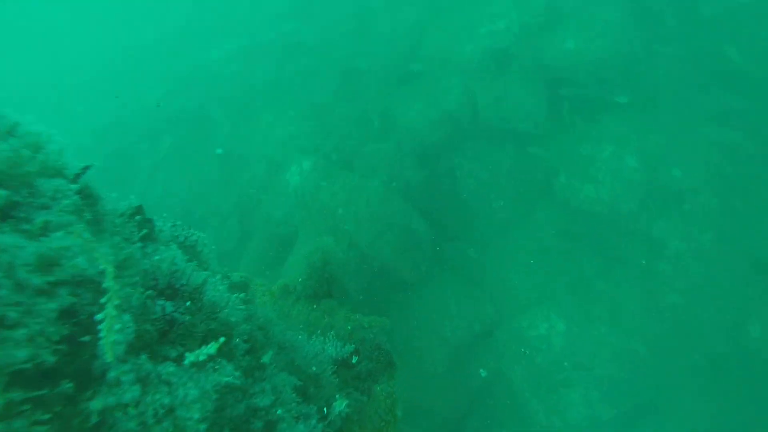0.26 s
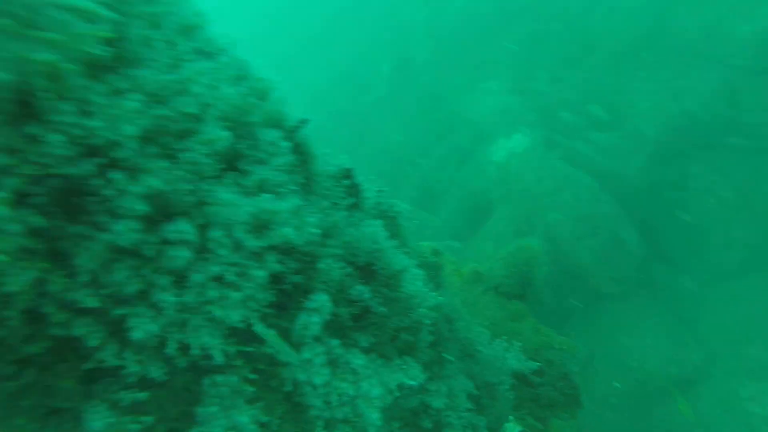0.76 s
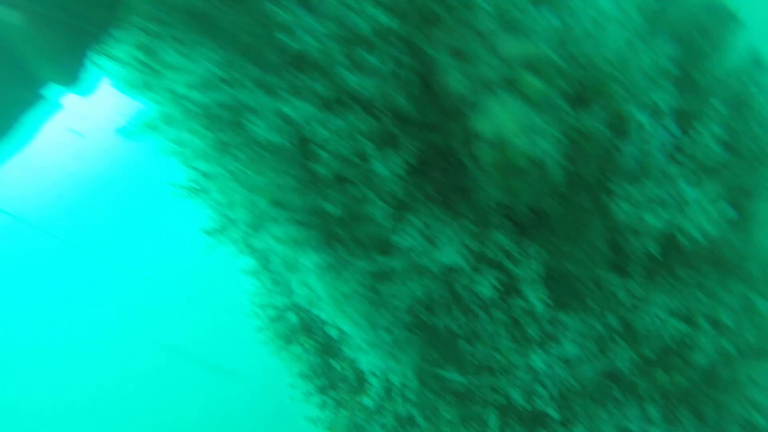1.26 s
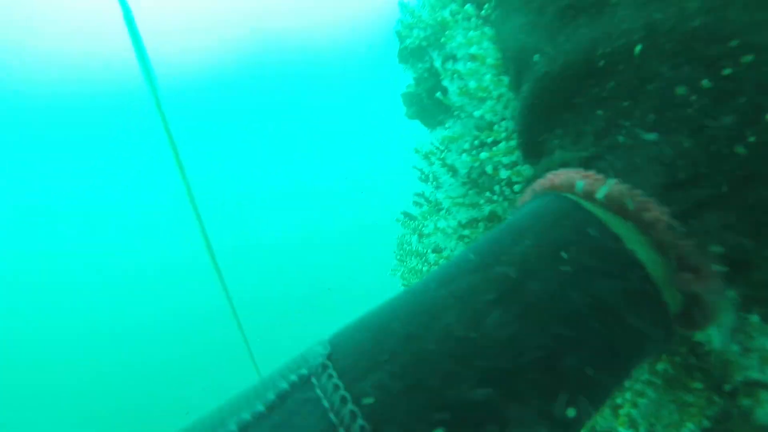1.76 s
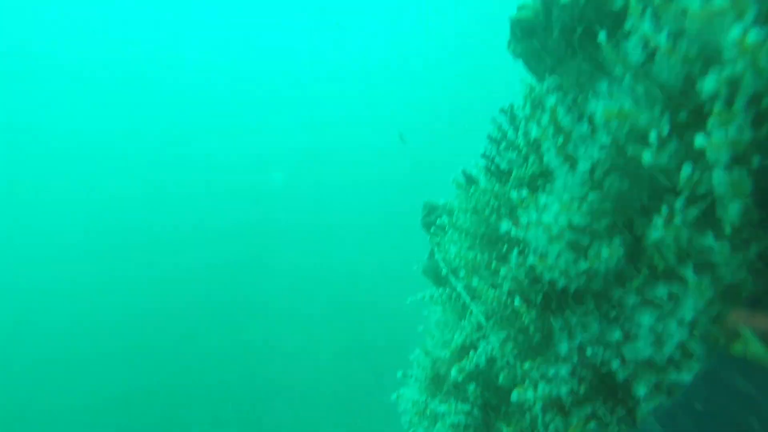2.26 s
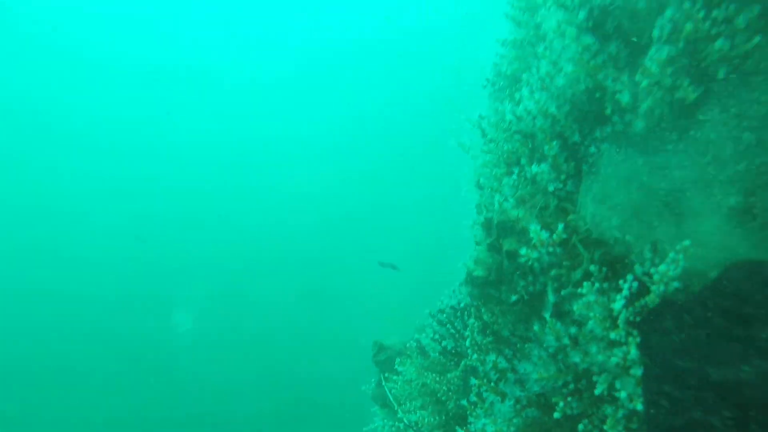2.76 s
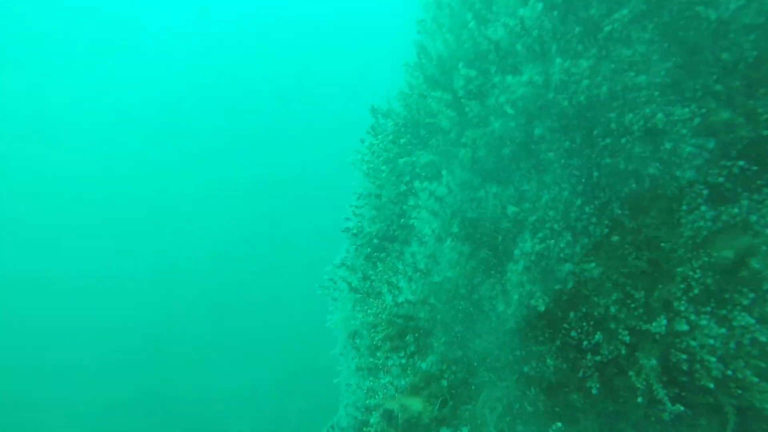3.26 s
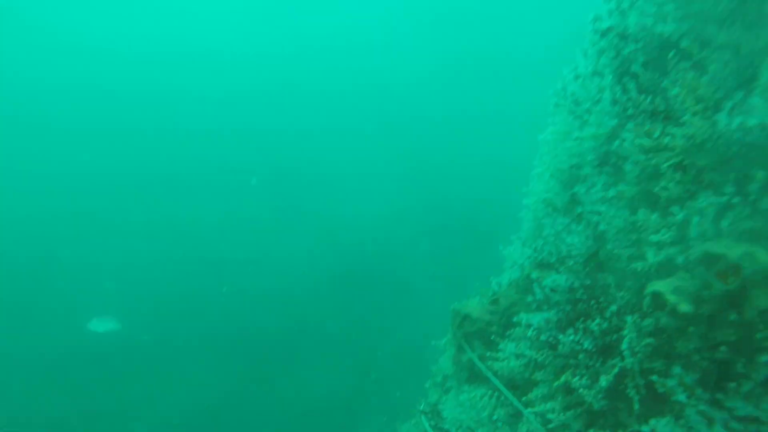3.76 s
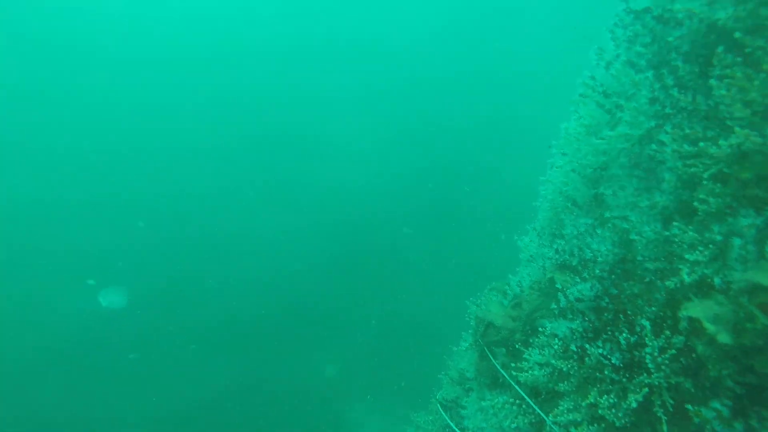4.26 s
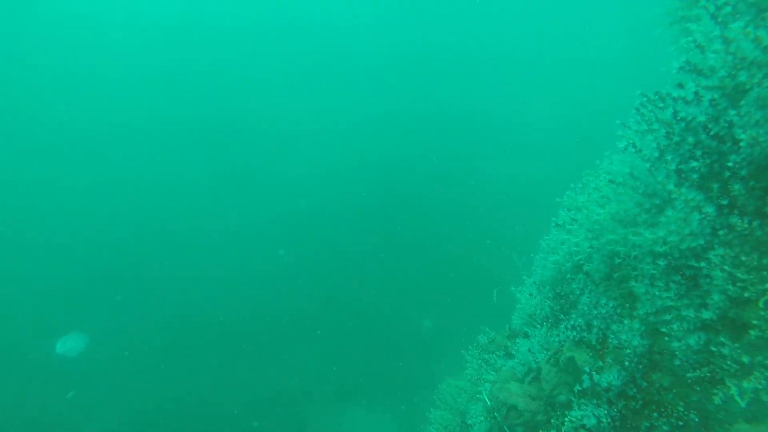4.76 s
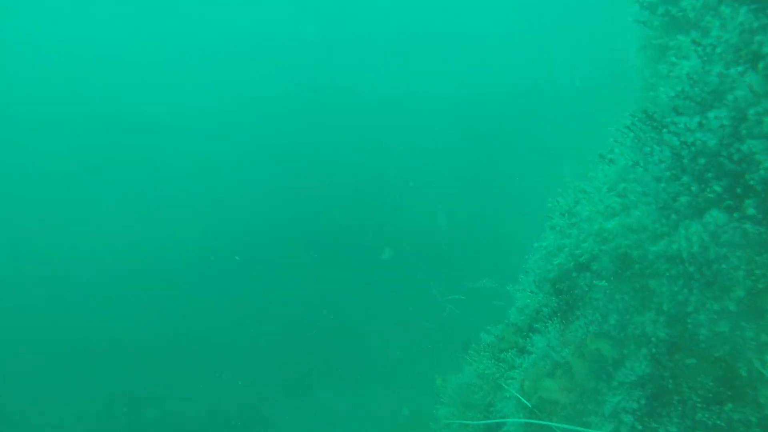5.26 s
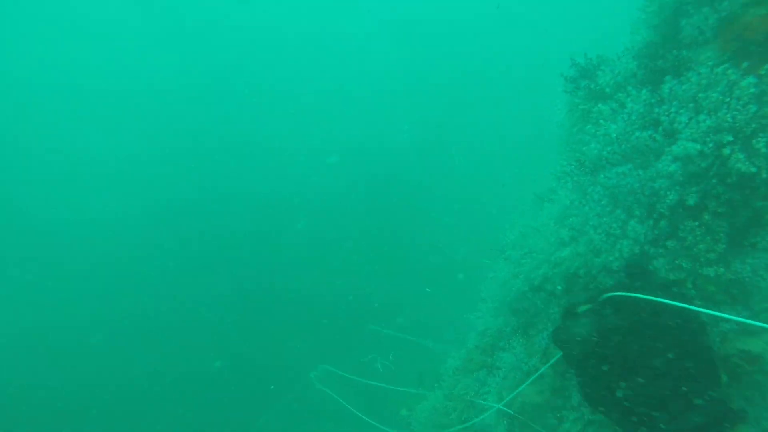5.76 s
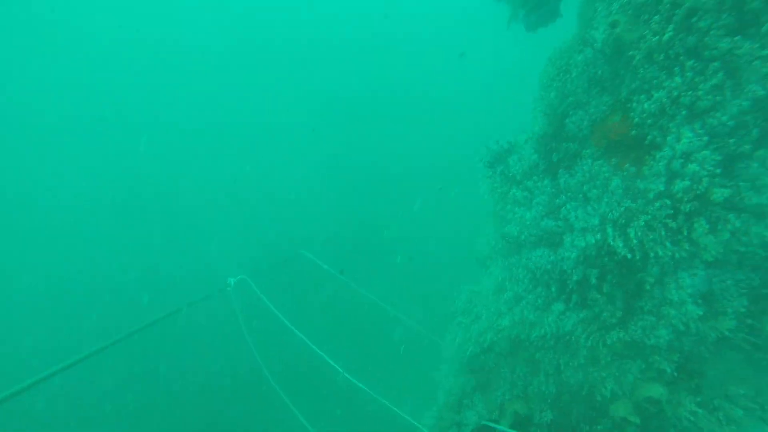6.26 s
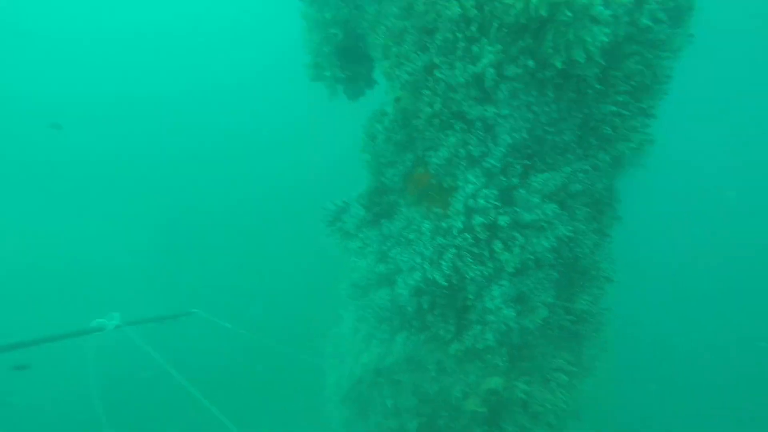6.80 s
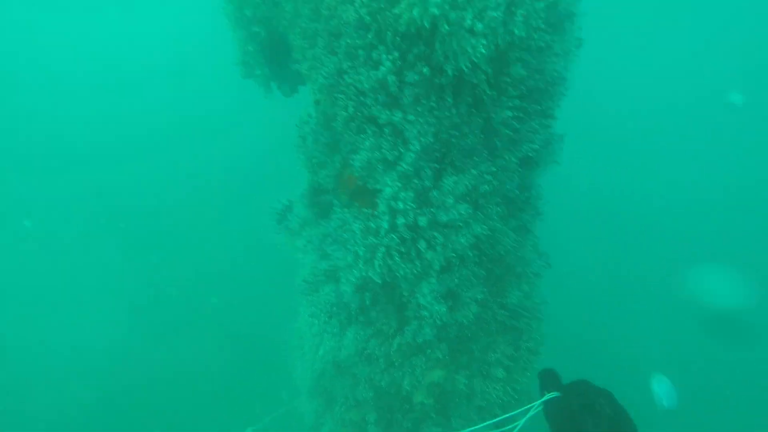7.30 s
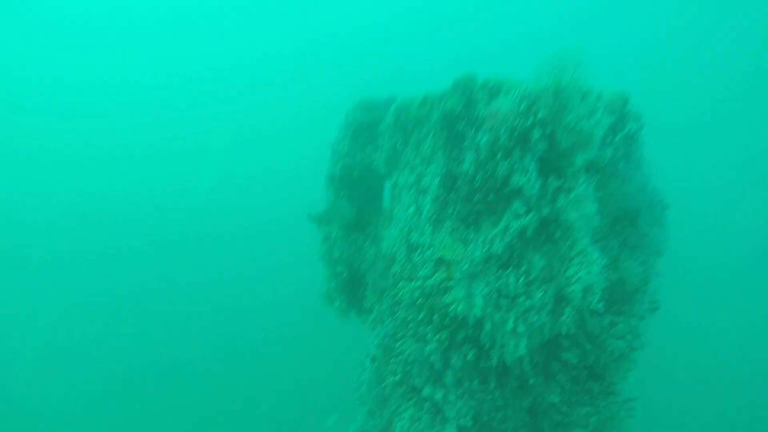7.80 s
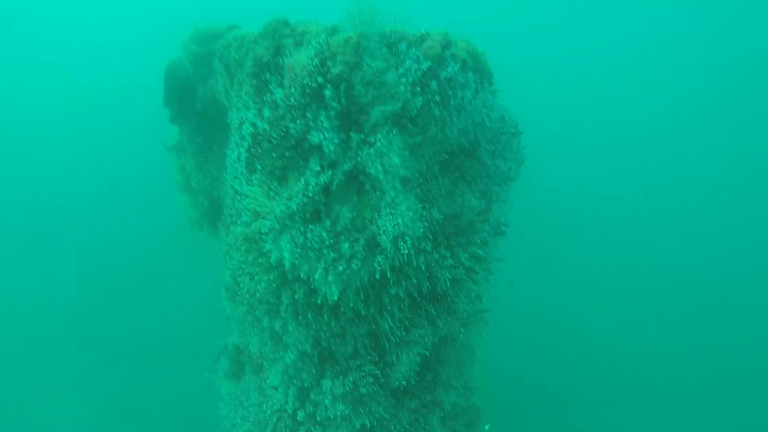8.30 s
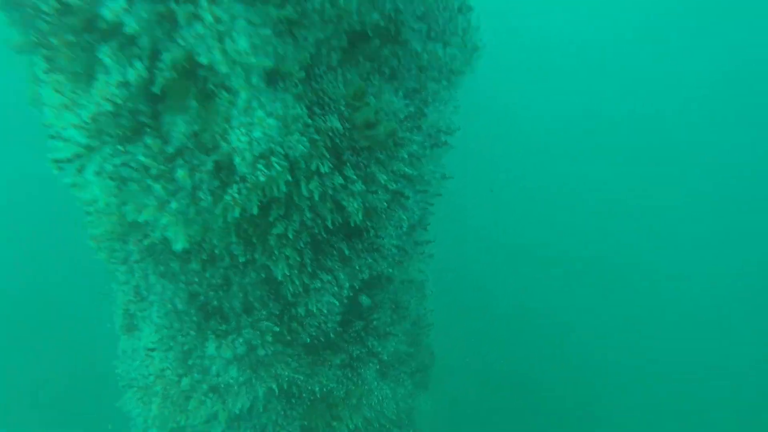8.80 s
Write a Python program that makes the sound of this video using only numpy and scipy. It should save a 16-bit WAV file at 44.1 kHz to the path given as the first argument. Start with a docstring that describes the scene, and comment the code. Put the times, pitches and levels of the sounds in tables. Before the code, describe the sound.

The microphone sits inside a waterproof case under water, so handling is close, hollow and boxy. A deep, wavering flow rumble and faint steady hiss run throughout, with a fine distant shrimp crackle. From 0.3 to 1.2 s the case is knocked repeatedly: the strongest hits at 0.32 and 0.6 ring around a mid-pitched shell note, with low thuds and scraping. A bubble ticks at 1.3. Rubbing continues; short rubber squeaks come at 2.0-2.2 and a falling one at 2.9, among lighter bumps. A hard knock cluster lands at 3.32-3.37, with a dull thump at 3.6. A plump bubble pops at 4.18. Sparse snaps follow, then bumps from 5.6 and the loudest sharp snap at 5.7. Bubbles burst in a quick run at 6.7-6.9, a faint knock comes at 7.35, and more plops scatter over 8.0-8.5. Clicks, hiss and rumble remain to about 9 s.

```python
"""A hand knocks and rubs a waterproof camera housing under water, heard from inside it: contacts
excite damped resonances of mount, shell, walls and window, and the grip thumps and squeaks.
Small bubbles pop close by as short sinking tones; shrimp snap in the growth on a piling as
pulses through resonances, echoed by the surface. Behind lie rumble and hiss as shaped noise."""
import sys
import numpy as np
from scipy import signal
from scipy.fft import rfft, irfft, next_fast_len
from scipy.io import wavfile
from scipy.ndimage import uniform_filter1d

SR = 44100
rng = np.random.default_rng(int(sys.argv[2]) if len(sys.argv) > 2 else 0)


def generate_wav(sig):
    """Save sig (samples, or channels by samples) to the path in sys.argv[1] as 16-bit PCM at SR."""
    pcm = np.round(np.clip(np.atleast_2d(sig).T, -1, 1) * 32767).astype(np.int16)
    wavfile.write(sys.argv[1], SR, pcm)


N = 398663
T = np.arange(N) / SR
EVENT_T = np.arange(SR // 4) / SR  # time axis of one short event
SNAP_T = EVENT_T[:2000]


def from_db(db):
    """Level law: decibels become an amplitude ratio."""
    return 10 ** (np.asarray(db) / 20)


def rms_one(x):
    """Power normalization: scale to rms 1."""
    return x / np.sqrt(np.mean(x ** 2) + 1e-20)


def peak_one(x):
    """Peak normalization: scale to peak 1."""
    return x / (np.abs(x).max() + 1e-12)


def burst_one(x):
    """Short-time power normalization: the loudest five milliseconds get rms 1."""
    power = uniform_filter1d(x ** 2, size=220)
    return x / np.sqrt(power.max() + 1e-20)


def add(out, s, sound):
    """Superposition: mix a sound in at a time in seconds."""
    i = max(int(s * SR), 0)
    out[i:i + len(sound)] += sound[:max(N - i, 0)]


def cut(x, hz, kind, order=2):
    """Butterworth filtering: low-pass or high-pass."""
    sos = signal.butter(order, min(hz, 0.45 * SR), kind, fs=SR, output="sos")
    return signal.sosfilt(sos, x)


def drift(rate):
    """Random modulation: straight lines between chance values, rate per second, rms 1."""
    knots = rng.standard_normal(4000)
    return rms_one(np.interp(T * rate, np.arange(len(knots)), knots))


def resonate(force, modes):
    """Modal superposition: parallel damped resonances with alternating signs."""
    out = 0
    for k, (hz, width, db) in enumerate(modes):
        r = np.exp(-np.pi * width / SR)
        poles = [1, -2 * r * np.cos(2 * np.pi * hz / SR), r * r]
        gain = (-1) ** k * from_db(db) * (1 - r * r) / 2
        out = out + gain * signal.lfilter([1, 0, -1], poles, force + 1e-18)
    return out


def coloured_noise(spectrum):
    """Spectral shaping: steady noise with a given spectrum, rms 1."""
    hz, db = np.transpose(spectrum)
    size = next_fast_len(N)
    bins = np.maximum(np.fft.rfftfreq(size, 1 / SR), 1)
    gain = from_db(np.interp(np.log(bins), np.log(hz), db, left=-90, right=-90))
    return rms_one(irfft(rfft(rng.standard_normal(size)) * gain, size)[:N])


def friction(count, grain_db):
    """Dry friction: a stream of tiny slips of uneven size."""
    return rng.standard_normal(count) * from_db(grain_db * rng.standard_normal(count))


def swell(rise):
    """Transient loading: a smooth rise to 1 at the rise time in seconds, then a decay."""
    return (EVENT_T / rise * np.exp(1 - EVENT_T / rise)) ** 2


# Resonances of the thin walls. Each row: pitch in Hz, width in Hz, relative level in dB.
WALL_MODES = [(949, 23, 0.5), (1120, 240, 3.5), (1513, 146, 0), (1600, 61, 1.5), (1880, 92, 3),
              (2072, 178, 2.5), (2396, 201, 2.5), (3150, 79, -9), (3650, 800, -12), (4230, 210, -15)]


def walls(force, top_hz):
    """Plate resonance: the thin walls ring between the shell note and an upper limit."""
    ringing = cut(resonate(force, WALL_MODES), top_hz, "low", order=4)
    return cut(ringing, 960, "high")


# Knocks on the housing. Each row: start in seconds, time to full force in seconds, then levels
# in dB before the overall trims: scuff of the walls, mount thud, shell ring, grit in the window.
KNOCKS = [(0.3164, 0.0039, -25, -50, -25, -44), (0.319, 0.0035, -20, -17.5, -20, -30),
          (0.322, 0.0038, -18.5, -23, -4, -56), (0.339, 0.0043, -38, -32, -22.5, -61),
          (0.595, 0.0054, -37.5, -45, -29, -50.5), (0.602, 0.0055, -20.5, -28, -9, -33),
          (0.612, 0.0026, -26, -25, -8.5, -46.5), (0.63, 0.0055, -37.5, -38.5, -33.5, -66.5),
          (0.713, 0.003, -45.5, -45, -41, -62), (0.82, 0.0063, -34, -38.5, -32, -58),
          (0.875, 0.0033, -26.5, -39, -14.5, -54), (0.883, 0.0038, -20.5, -24, -29, -49),
          (0.938, 0.0029, -29, -48, -26.5, -69), (0.975, 0.0066, -34.5, -28, -20.5, -75),
          (1.007, 0.0022, -30.5, -32.5, -23, -58), (1.089, 0.0074, -31, -39.5, -25, -54.5),
          (1.185, 0.0019, -21.5, -30.5, -22.5, -64), (1.203, 0.0038, -56, -40, -23, -74),
          (1.431, 0.0032, -40, -49, -32, -51.5), (2.029, 0.0088, -37.5, -44, -37.5, -58),
          (2.046, 0.0075, -37, -34.5, -44, -55.5), (2.209, 0.0043, -33.5, -28, -31, -62),
          (2.255, 0.0085, -42, -37.5, -50, -71), (2.316, 0.0028, -50, -29, -30.5, -76),
          (2.453, 0.0034, -42, -34, -32.5, -78), (2.706, 0.0022, -34, -27.5, -26, -61),
          (2.712, 0.0055, -34.5, -34, -28.5, -65), (2.913, 0.0032, -31.5, -26.5, -24.5, -52),
          (2.92, 0.0043, -39, -30, -23, -76), (3.318, 0.0032, -22.5, -21.5, -26, -42),
          (3.33, 0.0026, -17.5, -30.5, -24, -47), (3.339, 0.0033, -23.5, -20, -5, -51),
          (3.353, 0.0028, -28, -30, -13, -60), (3.365, 0.0041, -45.5, -32.5, -19.5, -58.5),
          (3.444, 0.0097, -39, -44, -39, -74), (3.461, 0.0096, -35.5, -46, -39, -78),
          (5.257, 0.01, -39, -45, -41, -61), (5.274, 0.0017, -36.5, -30, -36, -68),
          (5.588, 0.0076, -26.5, -37, -27, -53), (5.608, 0.0037, -25.5, -32, -26.5, -52),
          (5.672, 0.0053, -33.5, -34, -33, -61), (5.69, 0.0019, -21.5, -34, -25, -58),
          (5.6993, 0.0018, -18, -28.5, -19, -57), (7.345, 0.0045, -33, -42, -29, -49.5)]
# Resonances of mount, shell and window. Each row: pitch in Hz, width in Hz, relative level in dB.
MOUNT_MODES = [(112.6, 37, 1.5), (173, 51, 4), (229, 65, 2.5), (343, 108, 0), (428, 52, 3),
               (634, 207, -0.5)]
SHELL_MODES = [(765, 70, -5), (840, 60, 0)]
WINDOW_MODES = [(5570, 410, 2.5), (6180, 140, 4.5), (7210, 380, 3), (7950, 270, 2.5), (9430, 440, -1),
                (12200, 1200, -15.5), (14300, 730, -31.5)]
SHELL_HZ = 828


def knocks(rough=0.41, linger=0.14, linger_s=0.014, settle=0.14, settle_s=0.032,
           sharp_hz=4500, scuff_db=0.5, thud_db=0, ring_db=0, grit_db=0):
    """Impact excitation: each contact is a short skid that rings the shell and other parts."""
    out = np.zeros(N)
    for s, rise, scuff, thud, ring, grit in KNOCKS:
        slips = friction(len(EVENT_T), grain_db=1)
        skid = slips * (swell(0.87 * rise) + linger * np.exp(-EVENT_T / linger_s))
        shove = slips * (swell(1.44 * rise) + settle * np.exp(-EVENT_T / settle_s))

        note_hz = SHELL_HZ * (1 + 0.0069 * rng.standard_normal())
        note = np.sin(2 * np.pi * note_hz * EVENT_T)
        # the note needs a few cycles to build up
        clear_ring = burst_one(swell(1.02 * rise) ** 0.75 * note)
        shell = clear_ring + rough * burst_one(resonate(skid, SHELL_MODES))

        body = cut(cut(resonate(shove, MOUNT_MODES), 1000, "low"), 230, "high")
        top_hz = sharp_hz * (0.0053 / rise) ** 0.71  # slow contacts are duller
        window = cut(resonate(skid, WINDOW_MODES), 4200, "high")

        knock = from_db(ring + ring_db) * burst_one(shell)
        knock += from_db(thud + thud_db) * burst_one(body)
        knock += from_db(scuff + scuff_db) * burst_one(walls(skid, top_hz))
        knock += from_db(grit + grit_db) * burst_one(window)
        add(out, s, knock)
    return out


# Soft bumps of the mount. Each row: start in seconds, peak in dB, pitch in Hz, and the time in
# seconds in which the swing decays by 60 dB.
BUMPS = [(0.332, -27, 173, 0.21), (0.325, -26, 113, 0.16), (0.622, -32, 109, 0.28),
         (0.886, -21.5, 169.3, .15), (1.118, -25.5, 94, 0.12), (1.191, -27.5, 148.5, 0.2),
         (2.22, -32, 176, 0.18), (2.713, -33, 98, 0.04), (3.329, -23, 83.5, 0.13),
         (3.613, -20.5, 78, 0.015), (5.287, -37, 173, 0.35), (5.61, -30, 165, 0.17),
         (5.708, -24, 83, 0.075)]


def bumps():
    """Damped oscillation: the springy mount swings and dies away exponentially."""
    out = np.zeros(N)
    for s, db, hz, t60 in BUMPS:
        onset = 1 - np.exp(-2 * hz * EVENT_T)
        swing = np.sin(2 * np.pi * hz * EVENT_T) * from_db(-60 * EVENT_T / t60) * onset
        add(out, s, from_db(db) * peak_one(swing))
    return out


# Strokes of the grip on the case. Each row: start in seconds, length in seconds, level in dB
# before the overall trims, shell ring relative to that level in dB.
STROKES = [(0.798, 0.3, -42.5, 9), (1.104, 0.13, -50.5, 13.5), (1.248, .33, -47, 2),
           (2.016, 0.32, -50.5, 2.5), (2.375, 0.16, -54, 3.5), (2.65, 0.33, -60, 5.5),
           (3.446, 0.25, -55, 6.5), (3.908, 0.086, -53, -2), (4.321, .16, -47, -3), (4.625, 0.21, -58, 2.5),
           (4.999, 0.3, -54, -6), (5.521, 0.17, -50.5, 1.5), (6.107, 0.15, -59.5, 5),
           (6.646, 0.25, -53.5, 2.5), (7.04, 0.044, -50, 4), (7.224, 0.25, -53, -1.5),
           (7.553, 0.11, -54.5, 3), (8.456, 0.32, -60, -7)]
# the resting grip in shell and walls, and its random swing
REST_SHELL_DB, REST_WALL_DB, REST_SWING_DB = -60, -61, 3
# the mount's level at rest, and its dB per dB of the shell's rise above rest
REST_MOUNT_DB, MOUNT_FOLLOWS = -55.5, 0.42
STROKE_ATTACK_S, STROKE_RELEASE_S = 0.021, 0.016


def grip():
    """Power addition: strokes build on the resting grip; returns mount, shell and wall strength."""
    rest = from_db(REST_SWING_DB * drift(13))
    shell_power = (rest * from_db(REST_SHELL_DB)) ** 2
    wall_power = (rest * from_db(REST_WALL_DB)) ** 2
    for start, length, db, ring_db in STROKES:
        attack = np.clip((T - start) / STROKE_ATTACK_S, 0, 1)
        release = np.exp(-np.maximum(T - start - length, 0) / STROKE_RELEASE_S)
        push = from_db(db) * attack * release
        wall_power = wall_power + push ** 2
        shell_power = shell_power + (push * from_db(ring_db)) ** 2
    shell, wall = np.sqrt(shell_power), np.sqrt(wall_power)
    mount = from_db(REST_MOUNT_DB) * (shell / from_db(REST_SHELL_DB)) ** MOUNT_FOLLOWS
    return mount, shell, wall


def rubbing(shell_db=-1, wall_db=-1, mount_db=-1, edge_db=-11, grit_db=-25, judder_db=4, shift_db=4):
    """Friction excitation: the sliding grip feeds juddering slips into the same resonances."""
    mount, shell, wall = grip()
    slips = friction(N, grain_db=4) * from_db(judder_db * drift(160))
    # as the contact point moves, each wall resonance takes a changing share
    moving = np.zeros(N)
    for k, mode in enumerate(WALL_MODES):
        share = from_db(shift_db * drift(9))
        moving += (-1) ** k * resonate(slips, [mode]) * share
    wall_ring = cut(cut(moving, 1050, "high", order=3), 4600, "low", order=4)
    edge = cut(cut(slips, 4170, "low", order=8), 1298, "high")
    high = from_db(wall_db) * rms_one(wall_ring)
    high += from_db(edge_db) * rms_one(edge)
    high += from_db(grit_db) * rms_one(resonate(slips, WINDOW_MODES))
    middle = from_db(shell_db) * rms_one(resonate(slips, SHELL_MODES))
    low = from_db(mount_db) * rms_one(cut(resonate(slips, MOUNT_MODES), 550, "low"))
    return mount * low + shell * middle + wall * high


# Squeaks of the grip. Each row: start in seconds, length in seconds (played for a quarter second
# at most), start pitch in Hz, end pitch in Hz, rms level in dB, roughness from 0 to just above 1.
SQUEAKS = [(2.025, 0.044, 1976, 2165, -41.5, 0.75), (2.051, 0.18, 2070, 2050, -56, 0.75),
           (2.022, 0.26, 1650, 1605, -59, 0.4), (2.197, 0.014, 2040, 1970, -36, 0.4),
           (2.869, 0.061, 2420, 1970, -46.5, 0.7), (2.871, 0.06, 3650, 2940, -53, 1.1),
           (2.876, 0.05, 4450, 3970, -52, 1.2), (2.915, 0.04, 3650, 2640, -55, 0.9),
           (2.923, 0.05, 1650, 1300, -53.5, 0.5)]


def squeaks(wander_hz=110, flutter_db=5.9):
    """Stick-slip: rubber squeaks at a gliding pitch; roughness sways its pitch and strength."""
    out = np.zeros(N)
    for s, length, start_hz, end_hz, db, rough in SQUEAKS:
        count = min(int(length * SR), len(EVENT_T))
        wander, flutter = (rms_one(cut(rng.standard_normal(len(EVENT_T)), 180, "low"))[-count:]
                           for _ in range(2))
        hz = np.linspace(start_hz, end_hz, count) + rough * wander_hz * wander
        strength = from_db(flutter_db * rough * flutter) * signal.windows.tukey(count, 0.5)
        tone = np.sin(2 * np.pi * np.cumsum(hz) / SR) * strength
        add(out, s, from_db(db) * rms_one(tone))
    return out


def bubble(hz, rise, sag=0.042, rough=0.88, shell_share=0.1):
    """Bubble resonance: a quick swell rings out at a sinking pitch, nudging the shell; peak 1."""
    rise = max(rise, 0.0005)
    pitch_hz = hz * (1 + sag * (2 * np.exp(-EVENT_T / rise / 2) - 1))
    ring = np.sin(2 * np.pi * np.cumsum(pitch_hz) / SR) * swell(rise)
    # its wobbling skin blurs the note
    shaking = rng.standard_normal(len(EVENT_T)) * swell(1.17 * rise)
    wobble = resonate(shaking, [(hz, 0.5 * hz, 0)])
    shell = peak_one(resonate(wobble, SHELL_MODES))
    pop = ring + rough * peak_one(wobble) + shell_share * shell
    return peak_one(cut(pop, 1.22 * hz, "low", order=4))


# Pops of a small bubble and a larger partner. Each row: start in seconds, swell time in seconds
# (at least half a millisecond is played), small bubble's pitch in Hz, then the small bubble's
# peak and the partner's peak, both in dB before the overall trims.
POPS = [(0.5143, 0.0011, 1800, -50, -32), (1.3015, 0.0005, 2070, -24.5, -55),
        (2.339, 0.001, 1390, -38, -39), (2.5492, .00053, 3200, -27, -46), (2.84, 0.00065, 2140, -31, -42),
        (2.855, 0.00095, 2020, -26.5, -44), (3.9731, 0.00076, 2260, -29.5, -36),
        (4.1585, 0.0014, 1680, -36, -34), (4.1763, 0.00065, 1300, -27, -16.5),
        (6.7274, 0.0017, 1880, -28, -27.5), (6.756, .0014, 1620, -35, -48),
        (6.7854, .00035, 2000, -15.5, -33), (6.813, 0.00097, 2300, -29.5, -24.5),
        (6.8574, .0011, 2070, -25.5, -31), (6.865, .00048, 2140, -28.5, -33),
        (7.2948, 0.0013, 1890, -58, -29), (7.548, 0.0013, 1905, -49.5, -30),
        (8.041, 0.0012, 1770, -35, -38), (8.18, .002, 1860, -26, -24.5), (8.228, 0.0014, 2060, -31.5, -37),
        (8.3024, 0.0022, 1880, -53, -21), (8.433, 0.00094, 1520, -29.5, -21),
        (8.4503, 0.0015, 1790, -34, -31), (8.4632, 0.00093, 1650, -23, -27.5),
        (8.473, .00055, 1940, -27, -48), (8.5033, 0.00096, 2180, -32.5, -41)]
PARTNER_HZ = 808


def pops(level_db=-1, partner_db=-1, stray_db=-14, stray_s=0.0057, stray_pitch_db=0.81):
    """Paired resonators: bubbles pop in twos, each with a weaker one some milliseconds away."""
    out = np.zeros(N)
    for s, rise, small_hz, small_peak, partner_peak in POPS:
        pair = (small_hz, small_peak + level_db), (PARTNER_HZ, partner_peak + partner_db)
        for hz, db in pair:
            lag, size = rng.standard_normal(2)
            stray_hz = hz * from_db(stray_pitch_db * size)
            add(out, s, from_db(db) * bubble(hz, rise))
            add(out, s + stray_s * lag, from_db(db + stray_db) * bubble(stray_hz, rise))
    return out


# Flurries of faint bubbles. Each row: start in seconds, length in seconds.
FLURRIES = [(2.78, 0.13), (3.537, 0.088), (3.96, 0.03), (6.652, .18), (8.043, 0.034)]


def flurries(peak_db=-38, spread_db=2.5, low_hz=680, high_hz=2300, rise_s=0.00088, count=4):
    """Random succession: a few faint bubbles of chance pitch follow each other unevenly."""
    out = np.zeros(N)
    for start, length in FLURRIES:
        for k, (when, size) in enumerate(rng.random((count, 2))):
            pop = bubble(low_hz * (high_hz / low_hz) ** size, rise_s)
            level = from_db(peak_db + spread_db * rng.standard_normal())
            add(out, start + length * (k + when) / count, level * pop)
    return out


# Resonances that a snap wakes through the water. Each row: pitch in Hz, width in Hz, relative
# level in dB before the snap's own pitch favours its neighbours.
SNAP_MODES = [(801, 170, -0.5), (2293, 124, 10), (3290, 630, 2.5), (4050, 470, 6.5), (5330, 730, -2.5),
              (6000, 400, 1.5), (7400, 690, 2.5), (9820, 660, -2), (11900, 1900, -14), (14700, 790, -21)]


def snap(hz, focus_db=5, scatter=0.15, scatter_s=0.0018):
    """Cavitation: a collapsing cavity gives a pulse, scattered by the growth around it; peak 1."""
    tail = scatter * rng.standard_normal(len(SNAP_T)) * np.exp(-SNAP_T / scatter_s)
    pulse = (SNAP_T == 0) + tail
    # resonances lose focus_db per octave away from the snap's pitch
    modes = [(f, width, level - focus_db * abs(np.log2(f / hz))) for f, width, level in SNAP_MODES]
    return peak_one(resonate(pulse, modes))


# The nearest shrimp snaps. Each row: start in seconds, peak in dB, favoured pitch in Hz.
SNAPS = [(0.418, -43, 7400), (0.555, -35, 7200), (0.5795, -23, 7250), (0.591, -34, 3170),
         (0.6764, -42.5, 5430), (1.508, -32.5, 3880), (1.956, -33, 4680), (1.973, -35, 4800),
         (2.166, -35, 4180), (3.1238, -38.5, 3620), (3.6057, -35.5, 4060), (4.2304, -29, 4970),
         (4.3331, -35, 3740), (5.0073, -38.5, 4300), (5.1655, -39, 4030), (5.4295, -35, 3720),
         (5.5096, -27, 4190), (5.691, -19.5, 3310), (5.7021, -11.5, 3400), (5.796, -26.5, 3870),
         (6.356, -38.5, 4190), (6.4445, -38, 7850), (6.576, -27, 4100), (6.6163, -33.5, 3860),
         (6.766, -38, 4250), (6.8274, -35, 3840), (7.0284, -34, 4180), (7.3018, -38, 4300),
         (7.528, -40, 7450), (7.5493, -38.5, 4120), (7.7311, -26, 4200), (7.8458, -32, 3300),
         (8.001, -31, 4220), (8.1, -38.5, 3340), (8.3392, -35, 4100), (8.623, -35, 4260),
         (8.906, -28.5, 2420)]


def near_snaps(stray_db=-49, stray_range_db=7, low_hz=3400, high_hz=7800, count=36):
    """Impulsive sources: the nearest shrimp, and weaker neighbours snapping at random."""
    out = np.zeros(N)
    for s, db, hz in SNAPS:
        add(out, s, from_db(db) * snap(hz))
    for when, size, colour in rng.random((count, 3)):
        hz = low_hz * (high_hz / low_hz) ** colour
        add(out, when * N / SR, from_db(stray_db + stray_range_db * size) * snap(hz))
    return out


def far_snaps(per_s=170, spread_db=7, level_db=-73):
    """Random pulse train: many distant shrimp make a fine crackle."""
    sizes = from_db(spread_db * np.minimum(rng.exponential(1, N), 3))
    signs = rng.choice([-1, 1], N)
    pulses = sizes * signs * (rng.random(N) < per_s / SR)
    return from_db(level_db) * rms_one(cut(resonate(pulses, SNAP_MODES), 3500, "high"))


def surface_echo(x, delay_s=0.0076, echo_db=-17, scatter_s=0.0044):
    """Diffuse reflection: the rippled surface returns a delayed, smeared copy."""
    smear = rng.standard_normal(len(SNAP_T)) * np.exp(-SNAP_T / scatter_s)
    echo = signal.fftconvolve(x, smear / np.linalg.norm(smear))
    out = x.copy()
    add(out, delay_s, from_db(echo_db) * echo)
    return out


# Water pushing on the case. Each row: time in seconds, level in dB before the overall trim.
FLOW = [(0.0, -40), (0.43, -43.5), (0.6, -36.5), (1.85, -37), (2.0, -34), (3.22, -36.5), (3.35, -33),
        (4.1, -36.5), (4.86, -42), (5.5, -40.5), (5.71, -37), (5.96, -40), (6.77, -34.5), (7.58, -32.5),
        (9.04, -35.5)]
# Spectrum of the rumble. Each row: frequency in Hz, relative level in dB per Hz before evening out.
RUMBLE_SPECTRUM = [(6, -12), (14, -3), (25, -2), (37, 0), (50, -6), (65, -10), (80, -15), (110, -24),
                   (200, -38), (400, -52)]


def rumble(level_db=-1.5, evenness=0.24):
    """Flow noise: slow pressure swings of the water, partly evened out, follow the flow."""
    flow_db = np.interp(T, *np.transpose(FLOW))
    eddies = coloured_noise(RUMBLE_SPECTRUM)
    local_power = uniform_filter1d(eddies ** 2, size=12000)
    return from_db(flow_db + level_db) * rms_one(eddies / local_power ** (evenness / 2))


# Spectrum of the far sea hiss. Each row: frequency in Hz, relative level in dB per Hz.
SEA_SPECTRUM = [(100, -8), (300, -10), (550, -11.5), (1200, -11.5), (2300, -12), (2900, -17), (4200, -17),
                (4800, -19.5), (7500, -24.5), (8700, -29), (9700, -29.5), (11000, -30), (13000, -33.5),
                (15000, -36.5)]


def sea_hiss(level_db=-60):
    """Ambient noise: the far sea is a steady shaped hiss."""
    return from_db(level_db) * coloured_noise(SEA_SPECTRUM)


def scene():
    """Superposition: housing, bubbles and shrimp over the rumble and hiss of the sea."""
    housing = knocks() + bumps() + rubbing() + squeaks()
    bubbles = pops() + flurries()
    shrimp = surface_echo(near_snaps() + far_snaps())
    return (housing + bubbles + shrimp + rumble() + sea_hiss())[None]


def record(dry):
    """Clipping and band limiting: peaks stop at full scale, then a steep low-pass cuts the top."""
    return cut(np.clip(dry, -1, 1), 15400, "low", order=16)


dry = scene()
out = record(dry)
generate_wav(out)
```